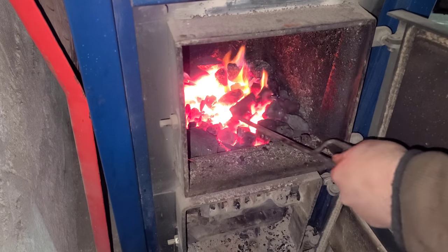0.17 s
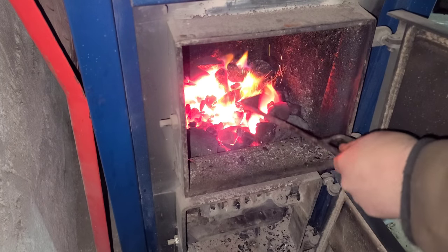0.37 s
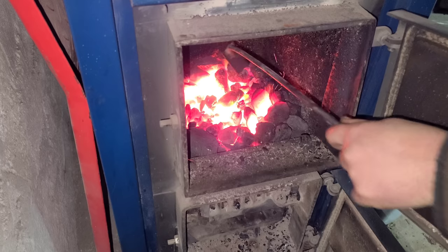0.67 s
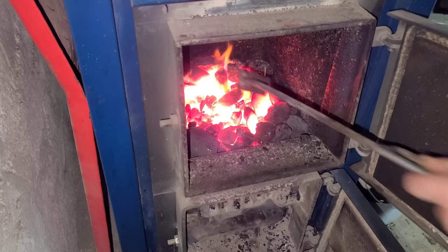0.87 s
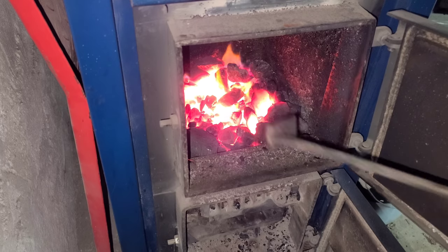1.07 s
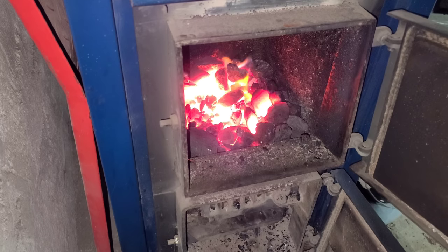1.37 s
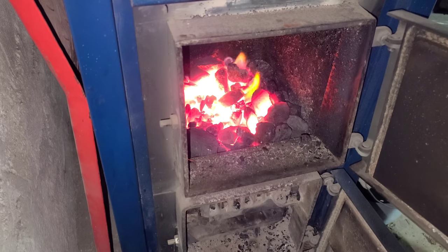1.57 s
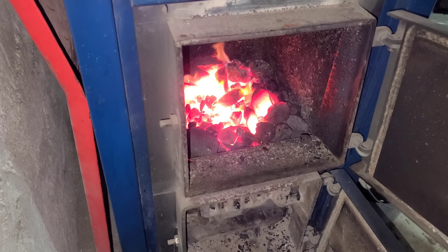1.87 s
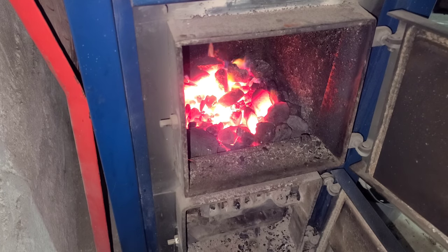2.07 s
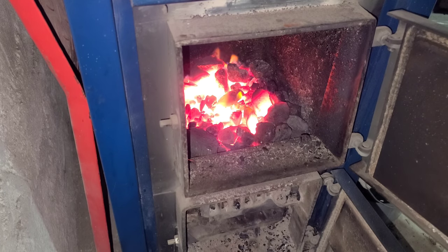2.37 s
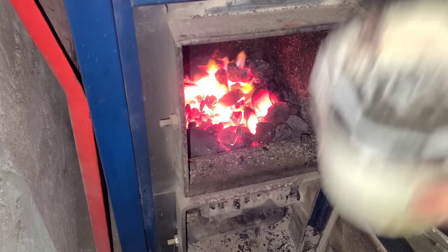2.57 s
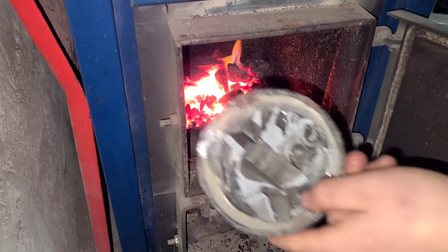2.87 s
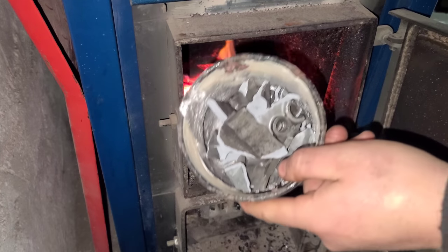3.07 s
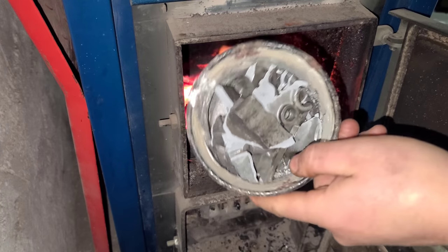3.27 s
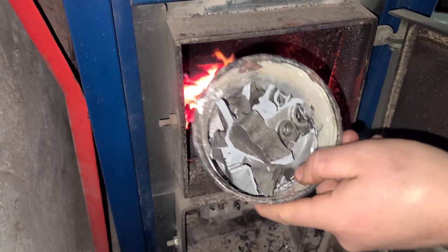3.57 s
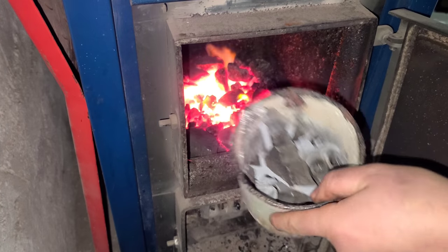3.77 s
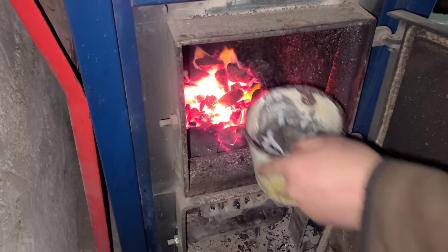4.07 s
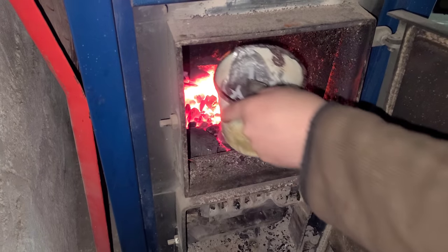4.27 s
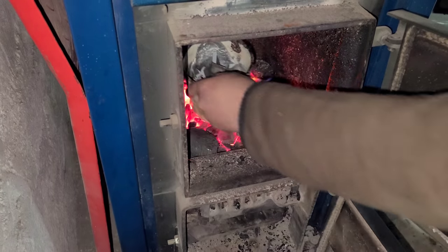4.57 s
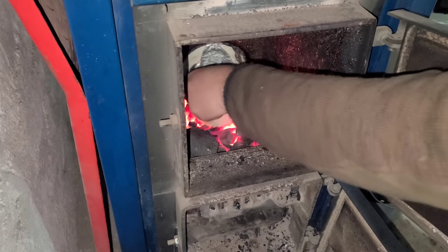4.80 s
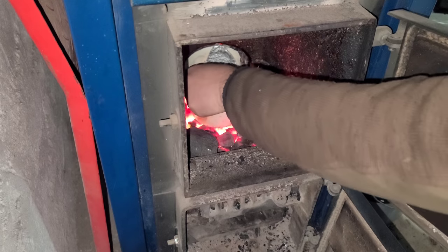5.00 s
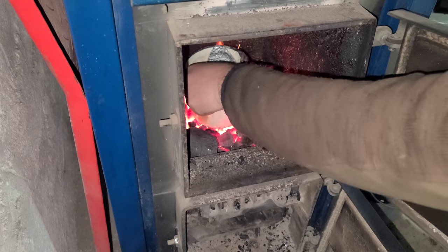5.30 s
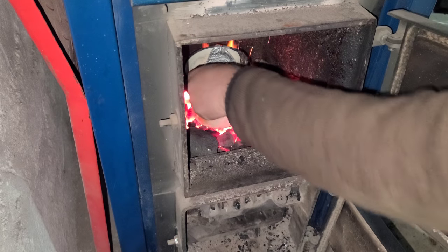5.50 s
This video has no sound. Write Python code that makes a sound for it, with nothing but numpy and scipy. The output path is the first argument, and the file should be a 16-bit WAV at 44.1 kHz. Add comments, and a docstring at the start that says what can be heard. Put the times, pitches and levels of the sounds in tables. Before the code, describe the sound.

Close firebox sounds: brief raking, low bumps, light tin rattles, one loud metallic clank, then gritty scraping shoves over a soft draught rumble.

```python
"""A tin of scraps rattles as it is handled, clanks on a steel firebox and is ground into the coals.
Before that a steel rod rakes the glowing coals and is set aside with dull thuds.
Embers snap and the draught rumbles; a small workshop, two close microphones at arm's length.
Impacts are noise bursts with ringing modes; rubbing and grinding are tiny random slips that
follow the hand's pressure; the fire is coloured noise with the flue's resonances."""
import sys
import numpy as np
from scipy import signal
from scipy.fft import rfft, irfft, next_fast_len
from scipy.io import wavfile

SR = 44100
rng = np.random.default_rng(int(sys.argv[2]) if len(sys.argv) > 2 else 0)


def wav_record(signal):
    """Record a signal, one row per channel, as 16-bit PCM in the file named by sys.argv[1]."""
    frames = np.transpose(np.atleast_2d(signal))
    bounded = np.clip(frames, -1, 1)
    # unit amplitude maps onto the largest positive 16-bit level
    quanta = np.round(bounded * 32767).astype(np.int16)
    wavfile.write(sys.argv[1], SR, quanta)


N = 248724
TIME = np.arange(N) / SR
RING_TIME = TIME[:SR]

# spectrum of splitting coal, for the large snaps and the small ticks: frequency_hz, level_db
SNAP_COLOUR = [(410, -52.5), (700, -9), (2520, -5), (2730, -2), (3800, -13), (4920, -4.5), (5310, -12),
               (15000, -7)]


def undb(db):
    """Decibels to gain."""
    return 10 ** (np.asarray(db) / 20)


def unit(x):
    """Scale to rms 1."""
    return x / np.sqrt(np.mean(x ** 2))


def tint(x, points):
    """Filter by a spectrum of (Hz, dB) points, causally so that attacks stay sharp."""
    size = next_fast_len(x.shape[-1] + 4096, True)
    hz, db = np.transpose(points)
    log_hz = np.log(np.fft.rfftfreq(size, 1 / SR) + 1)
    log_gain = np.log(undb(np.interp(log_hz, np.log(hz), db)))
    # folding the cepstrum onto positive time makes the filter minimum-phase
    cepstrum = irfft(log_gain, size)
    cepstrum[1:size // 2] *= 2
    cepstrum[size // 2 + 1:] = 0
    response = np.exp(rfft(cepstrum))
    return irfft(rfft(x, size) * response, size)[..., :x.shape[-1]]


def lean(x, db):
    """Place a sound to the left by a left-minus-right level."""
    return x * undb(np.array([[db], [-db]]) / 2)


def diffuse(size):
    """Even-spectrum noise that reaches the two ears out of step."""
    bins = size // 2 + 1
    phase = rng.uniform(0, 2 * np.pi, bins)
    lag = rng.choice([-1, 1], bins) * np.pi / 4
    spectrum = np.exp(1j * np.array([phase + lag, phase - lag]))
    return unit(irfft(spectrum, size))


def ring(modes, detune=0, size=SR):
    """Stereo ring of (Hz, relative dB, t60 s) modes from one blow, each detuned at random."""
    out, t = 0, RING_TIME[:size]
    for k, (hz, db, t60) in enumerate(modes):
        # alternate modes swing in opposite senses; pairs take turns to lead in one ear
        sense = (-1) ** k
        lag = (-1) ** (k // 2) * np.array([[1], [-1]]) * np.pi / 4
        bent_hz = hz * (1 + detune * rng.standard_normal())
        decay = undb(db - 60 * t / t60)
        out = out + sense * decay * np.sin(2 * np.pi * bent_hz * t + lag)
    return unit(out)


def crack(colour, t60, tail_db, tail_t60):
    """A burst of contact noise and its duller tail off nearby walls."""
    burst = diffuse(SR) * undb(-60 * RING_TIME / t60)
    tail = diffuse(SR) * undb(tail_db - 60 * RING_TIME / tail_t60)
    tail = tint(tail, [(1000, 5), (4000, 5.5), (14000, -9)])
    return unit(tint(burst + tail, colour))


def blows(rows, colour, modes, ring_db, t60, tail_db, tail_t60, detune=0):
    """Each blow cracks and, given modes, rings the body; harder contact has more treble."""
    out = np.zeros((2, N + SR))
    for start_s, level_db, treble_db in rows:
        hit = crack(colour, t60, tail_db, tail_t60)
        if modes:
            hit = hit + undb(ring_db) * ring(modes, detune)
        hit = tint(hit, [(700, -treble_db / 2), (2000, 0), (7000, treble_db)])
        # the level refers to the first 5 ms
        attack_rms = np.sqrt(np.mean(hit[:, :SR // 200] ** 2))
        start = int(start_s * SR)
        out[:, start:start + SR] += undb(level_db) * hit / attack_rms
    return out[:, :N]


def strokes(rows):
    """Pressure builds by 20 dB over the build-up time and lets go by 20 dB over the release time."""
    power = 0
    for peak_s, level_db, build_s, release_s in rows:
        away = np.maximum((peak_s - TIME) / build_s, (TIME - peak_s) / release_s)
        power = power + undb(level_db - 20 * np.minimum(away, 10)) ** 2
    return np.sqrt(power)


def grit(rate, scatter_db):
    """Tiny random slips, rate a second, of very unequal size."""
    size = undb(scatter_db * np.minimum(rng.exponential(size=N), 4))
    slips = rng.random(N) < rate / SR
    return unit(slips * size * rng.choice([-1, 1], N))


def crunch(force, colour, t60):
    """Every slip makes a brief noisy crackle; the power follows the force."""
    keep = undb(-120 / (t60 * SR))  # on power, so 60 dB are lost in t60
    power = signal.lfilter([1 - keep], [1, -keep], force ** 2)
    crackle = tint(diffuse(N) * np.sqrt(power), colour)
    return unit(crackle) * np.sqrt(np.mean(power))


def excite(force, response):
    """Drive a body with a steady random force, keeping the force's power."""
    return signal.fftconvolve(force[None], response / np.sqrt(SR), axes=1)[:, :N]


def travelling(force, response, size=1024):
    """A moving contact: every short stretch of force meets a fresh response of the body."""
    out = np.zeros((2, N + SR))
    for start in range(0, N, size):
        piece = force[None, start:start + size]
        if np.abs(piece).max() > 1e-4:  # skip stretches with next to no force
            body = response()
            sound = signal.fftconvolve(piece, body / np.sqrt(body.shape[1]), axes=1)
            out[:, start:start + sound.shape[1]] += sound
    return out[:, :N]


def fire():
    """The draught flutters, noise sounds the flue's resonances, and small cinders tick."""
    # spectrum of the draught: frequency_hz, level_db
    draught = [(13, -26), (22, -7), (107, 0.5), (212, -16), (294, -10.5), (337, -21.5), (420, -17),
               (508, -21.5), (786, -18.5), (901, -25), (1560, -23), (2760, -24.5), (5610, -33.5),
               (11700, -34.5), (15000, -40.5)]
    # the flue's hollow resonances: frequency_hz, level_db, t60_s
    flue_modes = [(68, -2.5, 0.34), (96.95, -5.5, 0.94), (268.9, -9.5, 0.56), (578, -18.5, 1),
                  (840, -26, .4), (1330, -10, 0.31)]
    # sixty random levels in dB, joined by straight lines
    flutter_db = np.interp(TIME, np.linspace(0, N / SR, num=60), rng.standard_normal(60))
    air = unit(tint(diffuse(N), draught)) * undb(flutter_db)
    flue = excite(rng.standard_normal(N), ring(flue_modes))
    ticks = crunch(grit(rate=50, scatter_db=4), SNAP_COLOUR, t60=.025)
    rumble = undb(-60) * (air + undb(-7.5) * flue)
    return lean(rumble + undb(-74.0) * ticks, db=0.5)


def embers():
    """Hot coal splits with dry snaps: short noise bursts without any ringing body."""
    # embers snapping: start_s, level_db (relative), treble_db
    snaps = [(0.0611, -40.5, -2), (0.3836, -42.5, 19), (0.602, -28, 12), (0.722, -52.5, 29),
             (1.6476, -46, 17), (2.4948, -37.5, -3), (2.655, -46.5, 10), (3.16, -46, 23),
             (3.2978, -49.5, -4), (4.2114, -38, -3), (4.3157, -49, -8), (4.346, -46.5, -10),
             (4.3612, -50, 0), (4.6437, -42.5, 18), (5.5677, -45, 13)]
    snapping = blows(snaps, SNAP_COLOUR, [], ring_db=0, t60=0.039, tail_db=-1, tail_t60=0.061)
    return lean(undb(-6.0) * snapping, db=3.0)


def rod_set_down():
    """Soft bumps of the rod being put aside set the surface under it booming low."""
    # bumps: start_s, level_db (relative), treble_db
    thuds = [(1.168, -50, 17), (1.412, -51.5, 3), (1.486, -47, -18), (1.522, -42, -33), (1.752, -54.5, 25),
             (2.039, -38.5, 6), (2.052, -39.5, -4), (2.101, -30.5, 16.5), (2.121, -31, -21),
             (2.145, -50, -15)]
    # spectrum of a bump: frequency_hz, level_db
    thud_colour = [(35, -39), (60, -2), (135, -3), (189, -17), (236, 2.5), (329, -5), (411, -6.5),
                   (963, -16), (1840, -32), (5000, -67), (6500, -77), (11000, -120)]
    # the surface under the rod: frequency_hz, level_db, t60_s
    thud_modes = [(115.6, 6, 0.49), (146.6, 4, 0.64), (230.7, 2, 0.59), (403.5, -1.5, 0.25),
                  (615, -1, 0.14), (800, 0.5, 0.092), (952, 1.5, 0.1), (1100, -4, 0.12),
                  (1632, -15.5, 0.21)]
    bumps = blows(thuds, thud_colour, thud_modes, ring_db=3, t60=.06, tail_db=-12, tail_t60=.35)
    return undb(-8.0) * bumps


def raking():
    """The rod bites and drags: cinders crunch along it, and firm pressure sets it humming."""
    # one firm stroke and one light: peak_s, friction_db (relative), build_s, release_s
    rake = [(0.27, -42, 0.28, 0.14), (0.54, -59.5, 0.9, .2)]
    # spectrum of the crunching cinders: frequency_hz, level_db
    rake_colour = [(88, -47), (150, -23.5), (364, -15), (416, -11.5), (477, -22), (612, -17), (2100, -22),
                   (2270, -19.5), (15000, -26.5)]
    # bending modes of the rod: frequency_hz, level_db, t60_s
    rod_modes = [(421.5, -7, 0.18), (438, -9.5, 0.49), (428, -1.5, 0.12), (1490, -13, 0.093),
                 (1800, -16, 0.18), (2220, -17, 0.088), (4240, -16, 0.051)]
    # the tip digs in with a short crunch, and nothing sounds before it
    bite_s, bite_db, bite_release_s = .06, -50, 0.041
    bite = strokes([(bite_s, bite_db, bite_release_s, bite_release_s)])
    pressure = np.hypot(strokes(rake), bite) * (TIME >= bite_s)
    # the rod hums only under firm pressure, and a moment late
    hum_db, hum_exponent, hum_lag_s = -40, 1.65, 0.0064
    late_pressure = np.interp(TIME - hum_lag_s, TIME, pressure / pressure.max())
    bending = late_pressure ** hum_exponent
    cinders = crunch(grit(rate=1800, scatter_db=3.5) * pressure, rake_colour, t60=0.02)
    hum_force = grit(rate=3500, scatter_db=3) * bending * undb(hum_db)
    hum = travelling(hum_force, lambda: ring(rod_modes, detune=0.0091, size=SR // 4))
    return lean(undb(2.0) * cinders + hum, db=1.5)


def handling():
    """Cloth and skin rub with each movement while scraps shift in the tin."""
    # movements of sleeve and hand: fastest_s, rubbing_db (relative), build_s, release_s
    moves = [(0.66, -65.5, 0.17, 1), (1.34, -56.5, 0.41, 0.24), (1.49, -51.5, 0.01, 0.077),
             (1.87, -57.5, 0.73, 0.45), (2.11, -54.5, 0.1, 0.065), (2.51, -61, 0.98, 0.63),
             (2.91, -59, .7, 0.27), (3.515, -43.5, 0.1, 0.14), (3.945, -54, .02, 0.018)]
    # spectrum of the rubbing: frequency_hz, level_db
    rub_colour = [(240, -47), (400, -13.5), (567, -7.5), (979, -12), (1120, -10), (1690, -7.5),
                  (2090, -12.5), (3290, -11.5), (7030, -20.5), (15000, -20.5)]
    # light clinks: first a tick as the rod is put aside, then the tin and its scraps: start_s, level_db
    # (relative), treble_db
    clink_rows = [(1.343, -30.5, 5.5), (2.31, -45, -8), (2.44, -44, -21), (2.465, -40, -19),
                  (2.512, -30, 9.5), (2.521, -34, 5), (2.678, -39.5, -34), (2.697, -40.5, -20),
                  (2.75, -45.5, -4), (2.86, -37.5, -20), (2.902, -39.5, 0), (2.938, -41, -2),
                  (3.416, -41, 7), (3.43, -29.5, 11), (3.457, -29, -8), (3.465, -29.5, 20),
                  (3.496, -30, -15), (3.503, -22.5, -9), (3.514, -23.5, 19.5), (3.521, -41, 12),
                  (3.545, -25, -8), (3.561, -40, -29), (3.595, -34, -25), (3.608, -30.5, -12.5),
                  (3.672, -45.5, -24), (3.941, -33, 12)]
    # spectrum of a clink: frequency_hz, level_db
    clink_colour = [(180, -51), (300, -36), (437, -14.5), (658, -11), (828, -26.5), (943, -0.5),
                    (1150, -24), (1670, -1.5), (2140, -12), (3670, -6.5), (5350, -16), (8600, -25.5),
                    (15000, -28.5)]
    # the tin held in the hand: frequency_hz, level_db, t60_s
    tin_modes = [(578.4, -2.5, 0.32), (667, 4, 0.15), (960, 7, 0.1), (1516, -19, 0.1), (1900, -0.5, 0.16),
                 (2100, -2, 0.047), (2744, 14, 0.068), (2896, 13.5, 0.093), (3190, 21, 0.022),
                 (3523, 10, 0.047), (4150, -15, 0.064), (5150, -11, 0.04)]
    rub = crunch(grit(rate=3600, scatter_db=2.0) * strokes(moves), rub_colour, t60=.009)
    clinks = blows(clink_rows, clink_colour, tin_modes, ring_db=-2.5, t60=0.051,
                   tail_db=-17.0, tail_t60=.15, detune=0.0235)
    return lean(undb(0.5) * rub + undb(-10.5) * clinks, db=1.3)


def grinding():
    """The tin sticks and slips over the coals; the notes of its wall shift from moment to moment."""
    # shoves of the tin into the coals: peak_s, friction_db (relative), build_s, release_s
    shoves = [(4.738, -36, 0.06, .035), (4.835, -42.5, 0.064, 0.034), (4.895, -29.5, 0.045, 0.037),
              (4.995, -34, 0.046, 0.096), (5.04, -31, 0.064, 0.092), (5.157, -37.5, 0.052, 0.057),
              (5.285, -30.5, 0.058, 0.027)]
    # tin catching on lumps of coal: start_s, level_db (relative), treble_db
    catch_rows = [(4.711, -25, 2), (4.734, -20, 1), (4.739, -21.5, -2.5), (4.772, -32.5, 2),
                  (4.892, -19, -14), (4.9, -20, -5), (4.908, -26, -3), (4.917, -27, 5), (5.006, -22.5, -6),
                  (5.027, -22, -10), (5.0415, -9.5, -1.5), (5.048, -27.5, -9), (5.056, -21.5, -18),
                  (5.085, -30.5, -5), (5.235, -31.5, -17), (5.287, -27, 2), (5.303, -34.5, 8),
                  (5.327, -22.5, 5), (5.35, -31.5, -17), (5.425, -39.5, 4)]
    # spectrum of tin on coal: frequency_hz, level_db
    slide_colour = [(41, -38), (70, -19), (197, -23.5), (403, -10), (517, -35), (565, -6.5), (661, 0.5),
                    (791, -15), (1330, -9.5), (1620, -20), (1860, -16), (3900, -22.5), (15000, -24.5)]
    # the tin pressed on the coals: frequency_hz, level_db, t60_s
    pressed_modes = [(579, -7, 0.13), (649.7, 2, 0.13), (687, -20, 0.19), (962, -1.5, 0.1),
                     (1025, -6.5, 0.16), (1156, 5.5, 0.047), (1314, 4.5, 0.075), (1670, -1.5, 0.044),
                     (1876, 5.5, 0.053), (2400, 2.5, 0.059), (2500, -15, 0.036), (2745, 0.5, 0.033),
                     (3380, -4.5, 0.089), (4370, 0, 0.029)]
    # the coal bed giving way under the tin: start_s, level_db (relative), treble_db
    slump_rows = [(4.895, -44, -2), (5.05, -39.5, -2), (5.168, -40.5, -7), (5.29, -43.5, -1),
                  (5.395, -52, -15)]
    # spectrum of the coal bed giving way: frequency_hz, level_db
    slump_colour = [(35, -15), (70, -3.5), (110, -0.5), (190, -19), (400, -19.5), (900, -39), (4000, -63)]
    # the tin's own weight drags lightly between shoves
    drag_from_s, drag_to_s, drag_db = 4.68, 5.38, -55
    drag = undb(drag_db) * (TIME > drag_from_s) * (TIME < drag_to_s)
    force = grit(rate=1200, scatter_db=3.5) * np.hypot(strokes(shoves), drag)
    scrape = crunch(force, slide_colour, t60=.032)
    wall = travelling(force, lambda: ring(pressed_modes, detune=0.02, size=SR // 5))
    catches = blows(catch_rows, slide_colour, pressed_modes, ring_db=3.5, t60=0.059,
                    tail_db=-15, tail_t60=0.28, detune=0.0276)
    slumps = blows(slump_rows, slump_colour, [], ring_db=0, t60=0.095, tail_db=-6.5, tail_t60=0.63)
    sliding = undb(-2) * scrape + undb(-7.5) * wall
    return lean(sliding + undb(-8.0) * catches + undb(-8.0) * slumps, db=0.9)


def clank():
    """The tin strikes the steel firebox and chatters against it."""
    # tin hitting the firebox and rebounding: start_s, level_db (relative), treble_db
    clanks = [(4.108, -7.5, 3), (4.1115, -17.5, 3), (4.122, -17.5, 7.5), (4.135, -18, 1),
              (4.1415, -11, 0.5), (4.166, -31.5, 15)]
    # spectrum of a clank: frequency_hz, level_db
    clank_colour = [(35, -44.5), (70, -4.5), (130, -10.5), (350, -3.5), (570, 6), (750, -7.5), (1000, -6),
                    (1800, -9), (2400, -19), (3000, -16), (6300, -27), (11000, -24.5), (15000, -26.5)]
    # steel firebox and tin ringing together: frequency_hz, level_db, t60_s
    box_modes = [(92, -24, .7), (125, -16, .4), (228, -17, .2), (270, -20, .35), (426, -7, .17),
                 (462, -7, .16), (523, -5, .14), (557, -2, .2), (614, -1, .19), (662, -12, .2),
                 (799, -9, .44), (854, -9, .15), (982, -12, .28), (1103, -14, .18), (1212, -18, .2),
                 (1317, -13, .26), (1510, -15, .24), (1626, -19, .22), (1742, -7, .17), (1955, -11, .14),
                 (2650, -15, .15), (2815, -17, .18), (3016, -14, .15), (4170, -19, .14)]
    hits = blows(clanks, clank_colour, box_modes, ring_db=2, t60=.07, tail_db=-17, tail_t60=.33)
    return lean(undb(-8.0) * hits, db=1.0)


def scene():
    """Everything at the firebox door."""
    return fire() + embers() + rod_set_down() + raking() + handling() + grinding() + clank()


def record(dry):
    """Two close microphones hear long waves alike; the top is cut steeply."""
    # how unlike the two microphones are: frequency_hz, side_gain_db
    width = [(60, -15), (160, -19.5), (300, -6), (600, -6.5), (1100, 0.5), (2000, -2.5), (5000, 0)]
    mid = (dry[0] + dry[1]) / 2
    side = tint((dry[0] - dry[1]) / 2, width)
    top_hz = 15700
    lowpass = signal.ellip(10, .2, 80, top_hz, fs=SR, output="sos")
    return signal.sosfilt(lowpass, np.array([mid + side, mid - side]))


dry = scene()
out = record(dry)
wav_record(out)
```